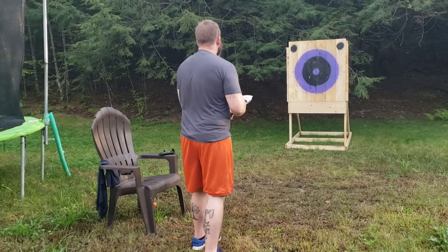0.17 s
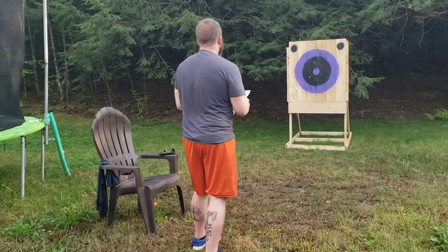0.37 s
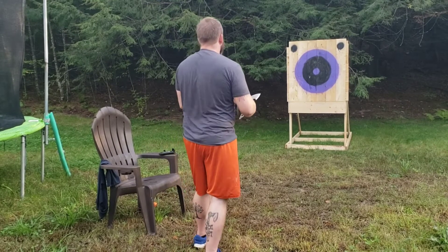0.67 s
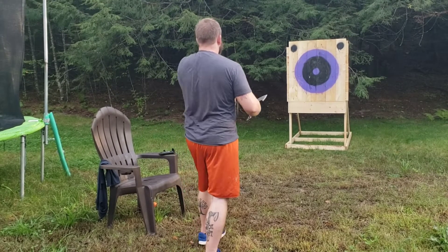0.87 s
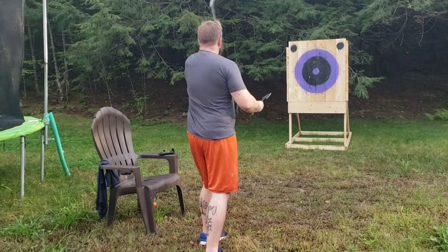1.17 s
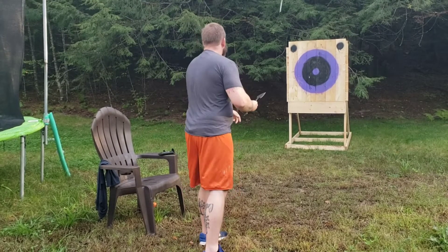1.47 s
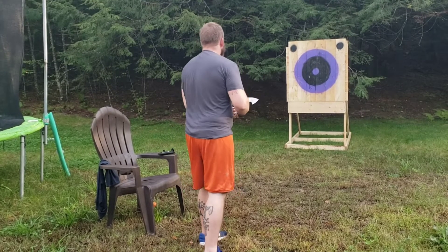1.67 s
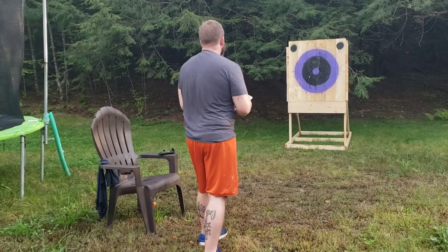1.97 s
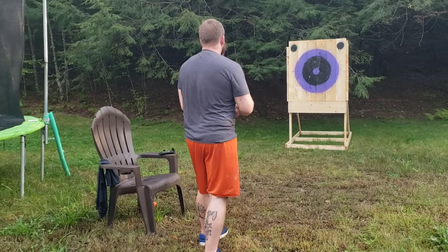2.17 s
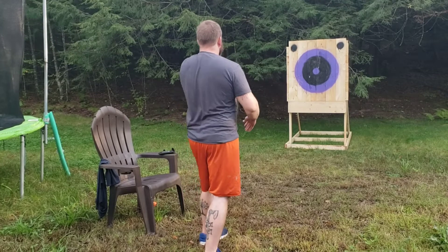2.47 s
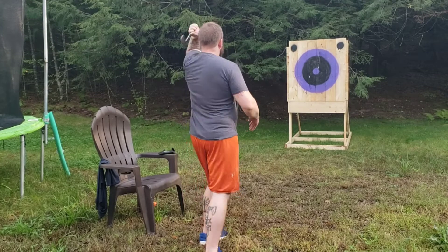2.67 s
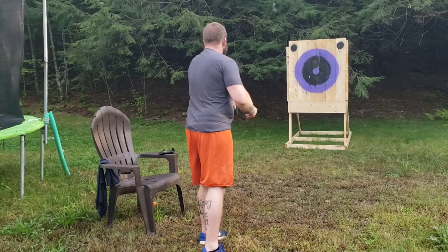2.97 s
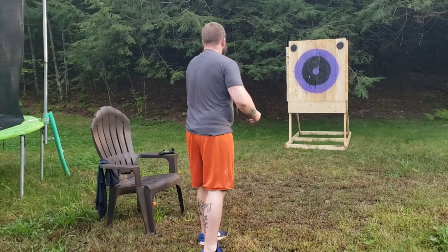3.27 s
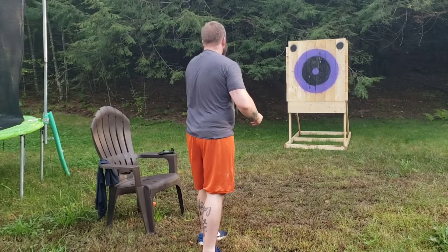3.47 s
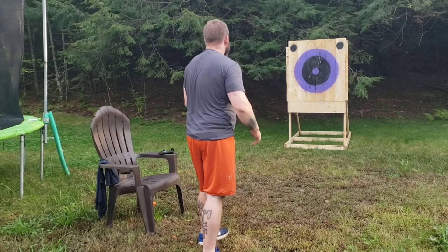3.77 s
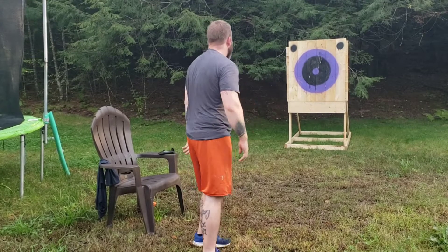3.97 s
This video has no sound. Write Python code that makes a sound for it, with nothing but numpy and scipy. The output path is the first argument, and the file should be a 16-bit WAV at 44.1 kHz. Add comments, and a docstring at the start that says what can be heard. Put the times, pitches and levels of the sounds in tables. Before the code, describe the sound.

Steel blades thud into wooden planks three times, with light metal clinks and faint clothing rustle close by outdoors.

```python
"""Three steel blades, thrown one after another, bite into a plank target in a back yard.
Each hit cracks the wood, drives the planks' modes in a hollow thwack and rattles them on their stand;
the stuck steel rings on and the trees return a soft tail. Close by, spare blades clink and slide in the
thrower's hand and his clothes swish. Behind are a small bird's peeps, faint squeaks and a low wash."""
import sys
import numpy as np
from scipy import signal
from scipy.fft import rfft, irfft, next_fast_len
from scipy.io import wavfile
from scipy.ndimage import uniform_filter1d, minimum_filter1d

SR = 44100
rng = np.random.default_rng(int(sys.argv[2]) if len(sys.argv) > 2 else 0)


def store_wav(level_fs):
    """Save 16-bit WAV to argv[1]."""
    pcm = np.round(np.clip(np.atleast_2d(level_fs), -1, 1) * 32767)
    wavfile.write(sys.argv[1], SR, pcm.T.astype(np.int16))


N = 181603
AGE_S = np.arange(48000) / SR


def amp(db):
    """Decibels to gain."""
    return 10 ** (np.asarray(db) / 20)


def unit_rms(x):
    """Scale to rms 1."""
    return x / np.sqrt(np.mean(x ** 2) + 1e-20)


def log_interp(points, hz):
    """Interpolate (freq_hz, value) points on a log-frequency axis."""
    freq_hz, value = np.transpose(points)
    return np.interp(np.log(hz + 1), np.log(freq_hz + 1), value)


def add(mix, start_s, sound):
    """Mix a sound in at start_s."""
    part = mix[max(round(start_s * SR), 0):][:len(sound)]
    part += sound[:len(part)]


def noise(colour, size=len(AGE_S)):
    """Unit-rms noise with a (freq_hz, level_db) spectrum."""
    padded = next_fast_len(size)
    gain = amp(log_interp(colour, np.fft.rfftfreq(padded, 1 / SR)))
    return unit_rms(irfft(rfft(rng.standard_normal(padded)) * gain, padded)[:size])


def flutter(smooth_samples, size=len(AGE_S)):
    """Smoothed unit-rms noise for modulation."""
    return unit_rms(uniform_filter1d(rng.standard_normal(size), smooth_samples))


def attack(rise_s):
    """Exponential rise to 1."""
    return 1 - np.exp(-AGE_S / rise_s)


def decay(t60_s):
    """Exponential fall from 1."""
    return np.exp(-np.log(1000) * AGE_S / t60_s)


def burst(colour, band_decays, size=len(AGE_S)):
    """Noise dying band by band, given (freq_hz, t60_s) points."""
    spectrum, hz = rfft(noise(colour, size)), np.fft.rfftfreq(size, 1 / SR)
    centres_hz, t60s_s = np.transpose(band_decays)
    shares = [log_interp(np.c_[centres_hz, pick], hz) for pick in np.eye(len(centres_hz))]
    bands = [irfft(spectrum * share, size) for share in shares]
    return sum(band * decay(t60_s)[:size] for band, t60_s in zip(bands, t60s_s))


def mode(freq_hz, level_db, t60_s, phase_turns=0):
    """One damped sine."""
    return amp(level_db) * decay(t60_s) * np.sin(2 * np.pi * (freq_hz * AGE_S + phase_turns))


def chirps(notes, waver_rms, octave_db, droop_power):
    """Short wavering tones that droop at the end."""
    out = np.zeros(N)
    for start_s, length_s, pitch_hz, fall_fraction, level_db in notes:
        progress = np.minimum(AGE_S / length_s, 1)
        bend = 1 - fall_fraction * progress ** droop_power + waver_rms * flutter(40)
        phase = 2 * np.pi * np.cumsum(pitch_hz * bend) / SR
        tone = np.sin(phase) + amp(octave_db) * np.sin(2 * phase)
        add(out, start_s, amp(level_db) * np.sin(np.pi * progress) * tone)
    return out


# Outdoor wash spectrum: freq_hz, level_db
AIR_COLOUR = [(20, -33.5), (35, -9), (50, 0.5), (70, -3.5), (130, -10.5), (285, -20), (400, -15.5),
              (575, -20), (800, -14.5), (1300, -22), (3500, -44.5), (4700, -32), (6300, -40.5),
              (12000, -40.5), (16000, -53.5)]


def air(wash_db=-52.5, rumble_db=-56):
    """Distant outdoor wash over a low rumble."""
    rumble = noise([(25, -21.5), (45, -2.5), (55, 4.5), (66, -4), (90, -22.0), (300, -77.5)], N)
    return amp(wash_db) * noise(AIR_COLOUR, N) + amp(rumble_db) * rumble


# Squeaks: start_s, length_s, pitch_hz, fall_fraction, level_db
SQUEAKS = [(0.077, 0.02, 2810, 0.41, -45.5), (0.10, 0.019, 2670, .1, -56), (4.05, 0.038, 2280, 0.107, -55),
           (4.098, 0.029, 1856, 0.018, -48)]


def squeaks():
    """Faint squeaks, raspy from fast pitch jitter."""
    return chirps(SQUEAKS, waver_rms=0.13, octave_db=-16.5, droop_power=1.75)


# Bird notes: start_s, length_s, pitch_hz, fall_fraction, level_db
PEEPS = [(2.22, 0.071, 5290, 0.015, -58.5), (2.43, 0.029, 5240, 0.046, -54),
         (3.222, 0.052, 5630, 0.14, -58.5), (3.438, 0.029, 5300, 0.024, -65),
         (3.638, 0.028, 5290, .05, -60), (4.049, 0.034, 5300, 0.022, -57.5)]


def bird(echo_db=-1.0, echo_t60_s=0.42):
    """Thin peeps linger among the trees."""
    peeps = chirps(PEEPS, waver_rms=0.007, octave_db=-6.5, droop_power=3.54)
    trees = rng.standard_normal(len(AGE_S)) * decay(echo_t60_s)
    return peeps + amp(echo_db) * signal.fftconvolve(peeps, trees / np.linalg.norm(trees))[:N]


# Cloth rub spectrum: freq_hz, level_db
CLOTH_COLOUR = [(200, 7), (1000, 0.5), (2000, 0.5), (3000, 1), (4500, -8), (8000, -4), (12000, -3),
                (14500, -7), (16000, -31.5)]
# Sleeve and shorts, one swish a move: peak_s, level_db, swell_s, zip_db
SWISHES = [(1.07, -61, 0.18, -10), (1.17, -57.5, 0.025, -3), (1.32, -53, 0.041, -20),
           (1.45, -61.5, 0.066, -10), (1.68, -64.5, 0.078, -22), (2.66, -62, 0.14, -9),
           (2.80, -57, 0.027, -4.5), (2.928, -53, 0.031, -18), (3.04, -68.5, 0.097, -8),
           (3.96, -63, 0.027, -6), (4.07, -62, 0.053, -12)]


def cloth_swishes(grain_db=2.0, zip_band_hz=(2520, 3480), settle_ratio=1.18, bell_power=1.73):
    """Cloth rubs in tiny catches as the arm swings; the weave's ridges zip on fast moves."""
    out, time_s = np.zeros(N), np.arange(N) / SR
    grain = amp(grain_db * flutter(90, N))
    rub = unit_rms(noise(CLOTH_COLOUR, N) * grain)
    weave = signal.butter(2, zip_band_hz, "bandpass", fs=SR, output="sos")
    zipping = unit_rms(signal.sosfilt(weave, rng.standard_normal(N)) * grain)
    for peak_s, level_db, swell_s, zip_db in SWISHES:
        width_s = swell_s * np.where(time_s < peak_s, 1, settle_ratio)
        speed = np.exp(-abs((time_s - peak_s) / width_s) ** bell_power)
        out += amp(level_db) * speed * (rub + amp(zip_db) * zipping)
    return out


# Cloth snaps and footfalls: start_s, level_db, centre_hz, t60_s
TAPS = [(1.296, -48.5, 3070, 0.061), (1.3601, -39.5, 2200, 0.03), (1.377, -46, 2000, 0.021),
        (1.356, -44.5, 113, 0.4), (1.47, -48.5, 89, .25), (1.633, -38.5, 238, 0.07),
        (2.876, -41.5, 202, 0.046), (2.905, -56, 2500, 0.071), (2.9243, -41, 2900, 0.035),
        (2.926, -42, 100.4, 0.34), (3.106, -44.5, 124, 0.053), (3.929, -57.5, 2950, 0.26)]


def snaps_and_steps(skirt_db=-16, rise_s=0.00048):
    """Cloth snaps or a foot shifts on grass: one dying band of noise each."""
    out = np.zeros(N)
    for start_s, level_db, hz, t60_s in TAPS:
        band = [(hz / 4, skirt_db), (hz / 1.5, 0), (hz * 1.5, 0),
                (hz * 4, skirt_db), (hz * 64, 4 * skirt_db)]
        add(out, start_s, amp(level_db) * noise(band) * decay(t60_s) * attack(rise_s))
    return out


# Spare blade modes: freq_hz, level_db, t60_s
STEEL_MODES = [(1835, -9, 0.078), (2060, -17, 0.18), (3060, -15, 0.073), (3270, -18.5, 0.087),
               (4460, -9.5, 0.055), (4560, -1, 0.031), (4488, -6, .3), (6443, -13.5, .48), (7755, -8, .12),
               (8010, -3, .06), (8090, -2, .06), (5722, -10.5, 0.085), (7230, -13, 0.083),
               (9790, -15.5, 0.12), (10100, -18.5, .08), (11240, -23, 0.14), (12200, -12, .06),
               (12520, -23, .05)]
# Steel-on-steel contact spectrum: freq_hz, level_db
CONTACT_COLOUR = [(800, -33), (2000, -15), (4500, -1.5), (8000, 1.5), (12500, -1), (15500, -14.5)]
# Blade along blade: start_s, length_s, level_db, pitch_ratio
SLIDES = [(0.102, 0.064, -60.5, 0.93), (0.205, 0.08, -55, 1.01), (0.357, 0.067, -50, 1.07),
          (0.426, 0.041, -50, 1), (0.456, 0.04, -64.5, 0.76), (0.662, 0.081, -63, 1.08),
          (0.815, .055, -68, 0.99), (1.864, .15, -69, 1.125)]


def blade_slides(gripped_t60_s=0.07, grit_db=-8, catch_db=4.0, detune_rms=0.033):
    """Sliding grit drives the steel's modes while the hand damps and detunes them."""
    out = np.zeros(N)
    for start_s, length_s, level_db, pitch_ratio in SLIDES:
        steel = np.zeros(len(AGE_S))
        for hz, mode_db, _ in STEEL_MODES:
            gripped_hz = hz * pitch_ratio * (1 + detune_rms * rng.standard_normal())
            # Halved dB: a moving contact reaches the weak modes too.
            steel += mode(gripped_hz, mode_db / 2, gripped_t60_s, rng.random())
        catches = amp(catch_db * flutter(60))
        stroke = np.sin(np.pi * np.minimum(AGE_S / length_s, 1))
        grit = unit_rms(noise(CONTACT_COLOUR) * catches) * stroke
        ringing = signal.fftconvolve(grit, steel / np.linalg.norm(steel))[:len(AGE_S)]
        add(out, start_s, amp(level_db) * (ringing + amp(grit_db) * grit))
    return out


# Blade against blade: start_s, level_db, t60_ratio, pitch_ratio
CLINKS = [(0.2266, -40, 0.22, 1), (0.436, -48, 0.63, 0.98), (0.4956, -28.5, 1, 1), (0.5025, -32, 0.66, 1),
          (0.5136, -31, 0.68, 1), (0.5226, -35, 0.52, 0.99), (2.928, -49, 0.88, .98)]


def blade_clinks(tick_db=-12, tick_t60_s=0.04):
    """Spare blades knock: a tick, then the steel rings as long as the grip allows."""
    out = np.zeros(N)
    for start_s, level_db, t60_ratio, pitch_ratio in CLINKS:
        steel = sum(mode(hz * pitch_ratio, mode_db, t60_s * t60_ratio, rng.random())
                    for hz, mode_db, t60_s in STEEL_MODES)
        tick = amp(tick_db) * noise(CONTACT_COLOUR) * decay(tick_t60_s)
        add(out, start_s, amp(level_db) * (steel + tick))
    return out


# Lawn and tree scatter: freq_hz, early_band_db, early_t60_s, late_band_db, late_t60_s
YARD_BANDS = [(60, 1, 0.28, -16.5, 1), (250, 8, .2, -20, 0.83), (540, -3, 0.34, -9.5, 0.99),
              (850, 2, .2, -15, 1), (1690, -6, 0.19, -21.5, 1), (2970, -22.5, 0.17, -33.5, 1),
              (6000, -30, 0.19, -39.5, 0.574), (12000, -31, 0.14, -51, .6), (16040, -43.5, 0.12, -55, 0.82)]


def yard_echo(early_db=-21, late_db=-36, early_rise_s=0.012, late_rise_s=0.061):
    """Each thwack scatters off the ground and stand, then faintly off the trees."""
    out = np.zeros(N)
    hz, early_band_db, early_t60_s, late_band_db, late_t60_s = np.transpose(YARD_BANDS)
    for start_s, _, _, echo_db in THROWS:
        early = burst(np.c_[hz, early_band_db], np.c_[hz, early_t60_s]) * attack(early_rise_s)
        late = burst(np.c_[hz, late_band_db], np.c_[hz, late_t60_s]) * attack(late_rise_s)
        add(out, start_s, amp(echo_db) * (amp(early_db) * early + amp(late_db) * late))
    return out


# Stuck blade tones: start_s, pitch_hz, level_db, t60_s
QUIVERS = [(0.27, 3074, -43, .19), (2.037, 797, -35, .55), (2.037, 1965, -50, .6), (2.037, 2148, -52, 2.2),
           (2.037, 4721, -46, 1.4), (2.037, 5615, -60, .7), (2.037, 7130, -53, .25),
           (2.037, 14160, -63, .5), (3.517, 888, -41, 1.4)]


def blade_quivers():
    """Each stuck blade rings on in its own modes."""
    out = np.zeros(N)
    for start_s, pitch_hz, level_db, t60_s in QUIVERS:
        add(out, start_s, mode(pitch_hz, level_db, t60_s))
    return out


# Crack and knock spectrum: freq_hz, level_db
WOOD_COLOUR = [(100, -12.5), (400, 1.5), (800, 5.5), (1500, -9), (3000, -10), (5000, -18.5), (8000, -25),
               (12000, -29), (16000, -41.5)]
# Crack and knock decay: freq_hz, t60_s
WOOD_DECAY = [(100, 0.092), (800, 0.062), (2500, 0.039), (6000, 0.019), (15000, 0.016)]
# Entry cracks, then knocks on the stand: start_s, level_db, t60_ratio, tilt_db_per_octave
CRACKS_AND_KNOCKS = [(0.267, -23, 0.36, 8), (0.2686, -10.5, 0.72, 0.5), (0.2722, -20, 0.47, 3),
                     (0.298, -31.5, 1.2, -2), (2.0358, -8, 0.75, -1.5), (2.0383, -3, 0.49, -.5),
                     (2.0449, -12, 1.2, -2.5), (3.5149, -20, 1.13, 4.5), (3.5170, -6.5, 0.85, -0.5),
                     (3.534, -29.5, 0.73, -7), (3.546, -28.5, 2.2, -4)]


def cracks_and_knocks(rise_s=0.00018, size=8192):
    """Wood cracks as the blade enters, then the planks knock and rattle against their stand."""
    out = np.zeros(N)
    for start_s, level_db, t60_ratio, tilt_db_per_octave in CRACKS_AND_KNOCKS:
        colour = [(hz, band_db + tilt_db_per_octave * np.log2(hz)) for hz, band_db in WOOD_COLOUR]
        band_decays = [(hz, t60_s * t60_ratio) for hz, t60_s in WOOD_DECAY]
        wood = burst(colour, band_decays, size) * attack(rise_s)[:size]
        add(out, start_s, amp(level_db) * wood)
    return out


# Plank and stand modes, by strike point: freq_hz, t60_s, throw1_db, throw2_db, throw3_db
PLANK_MODES = [(69.7, 0.35, -15.5, -33, -26), (114.6, 0.3, -21.5, -26.5, -30.5),
               (157.6, 0.21, -33, -20.5, -21.5), (223.4, 0.063, -39, -23.5, -31.5),
               (304, 0.066, -12.5, -22.5, -31.5), (395.6, 0.093, -10.5, -14, -11),
               (444, 0.074, -2, -0.5, -6.5), (508.7, 0.055, -39, -24, 0.5), (544, 0.12, -22, -13, -15),
               (608, 0.083, -23.5, -13.5, -18), (694.5, 0.06, -4.5, -7, -11.5),
               (763.7, 0.054, -2.5, -2.5, -7.5), (889, 0.092, -46, -18, -21),
               (1058, 0.031, -11.5, -20, -16), (1183, 0.049, -27, -19, -20.5),
               (1380, 0.033, -24, -22, -16.5), (1700, 0.018, -19, -32.5, -4.5),
               (1956, 0.0392, -32, -20, -45), (2500, 0.034, -21, -19, -24), (2920, 0.035, -17, -26, -45)]
# Blade hits: start_s, level_db, sink_s, echo_db
THROWS = [(0.2689, -3.5, 0.0015, -3), (2.0354, 2, 0.0041, -1), (3.5146, 3, 0.0025, 1.5)]


def plank_thwacks(lag_turns=0.141):
    """A sinking blade loads the planks; the bending wave's travel makes each mode lag the one below."""
    out = np.zeros(N)
    for throw, (start_s, level_db, sink_s, _) in enumerate(THROWS):
        planks = sum(mode(hz, strike_db[throw], t60_s, -lag_turns * rank)
                     for rank, (hz, t60_s, *strike_db) in enumerate(PLANK_MODES))
        add(out, start_s, amp(level_db) * planks * attack(sink_s))
    return out


def scene():
    """Mono sum of hits, thrower and surroundings."""
    background = squeaks() + bird() + air()
    thrower = cloth_swishes() + snaps_and_steps() + blade_slides() + blade_clinks()
    hits = yard_echo() + blade_quivers() + cracks_and_knocks() + plank_thwacks()
    return (background + thrower + hits)[None]


def record(dry, ceiling=1.0, limiter_samples=61, low_cut_hz=40, high_cut_hz=15600):
    """Low cut, fast limiter on the thwacks, high cut."""
    low_cut = signal.butter(2, low_cut_hz, "highpass", fs=SR, output="sos")
    high_cut = signal.firwin(255, high_cut_hz, window=("kaiser", 9), fs=SR)
    trimmed = signal.sosfilt(low_cut, dry)
    allowed_gain = ceiling / np.maximum(abs(trimmed), ceiling)
    smooth_gain = uniform_filter1d(minimum_filter1d(allowed_gain, limiter_samples), limiter_samples)
    return signal.oaconvolve(trimmed * smooth_gain, high_cut[None], "same")


dry = scene()
out = record(dry)
store_wav(out)
```